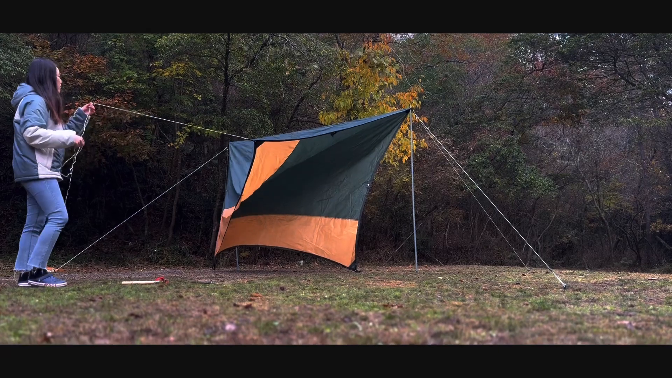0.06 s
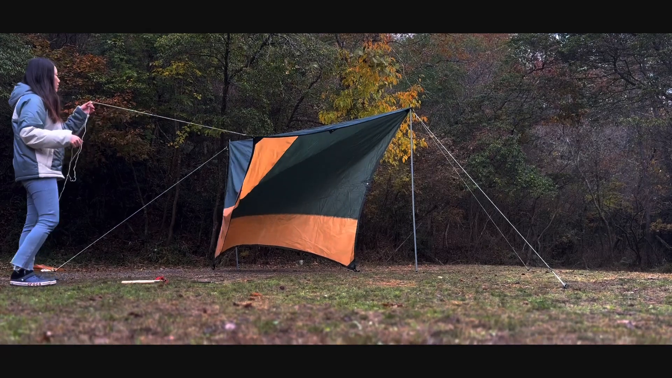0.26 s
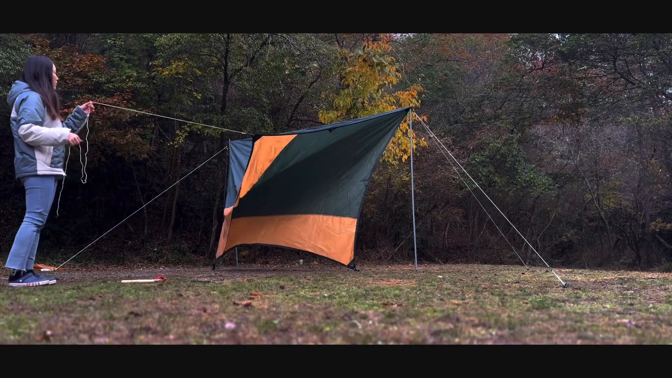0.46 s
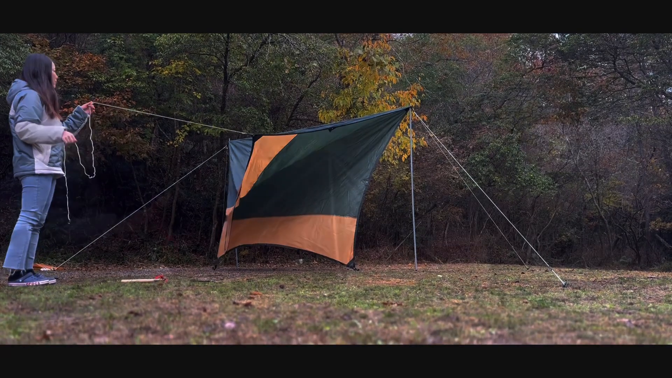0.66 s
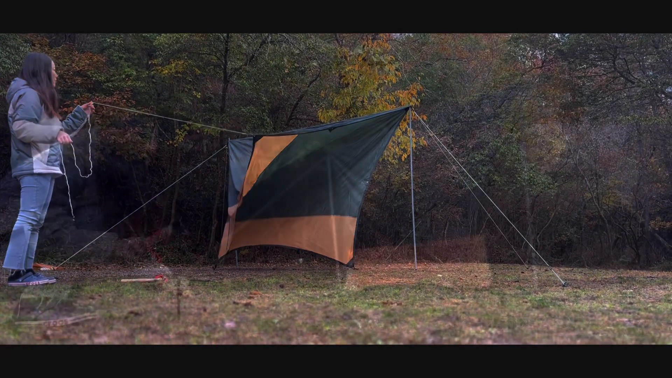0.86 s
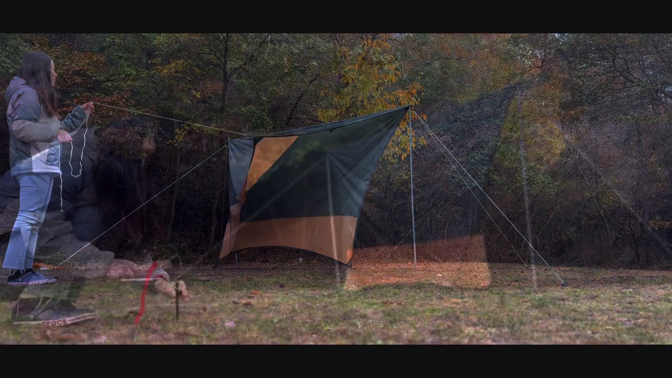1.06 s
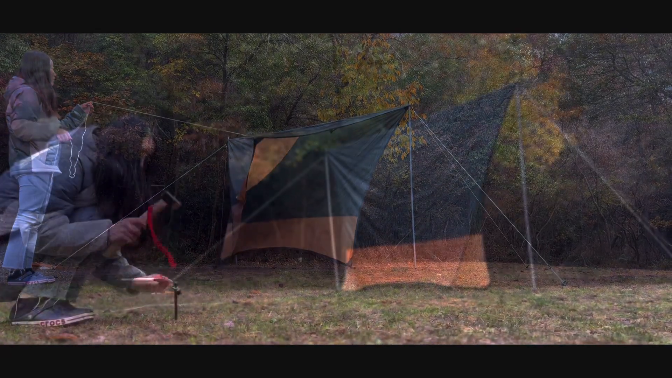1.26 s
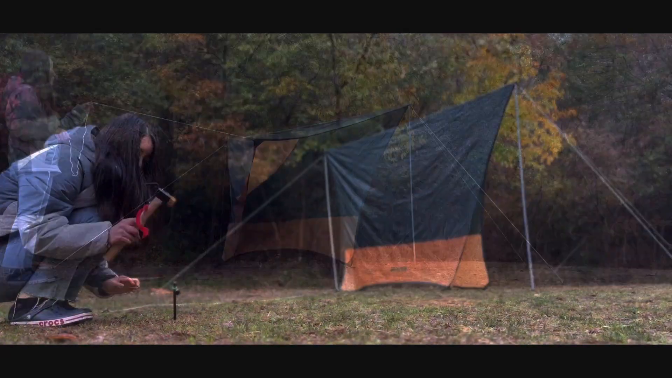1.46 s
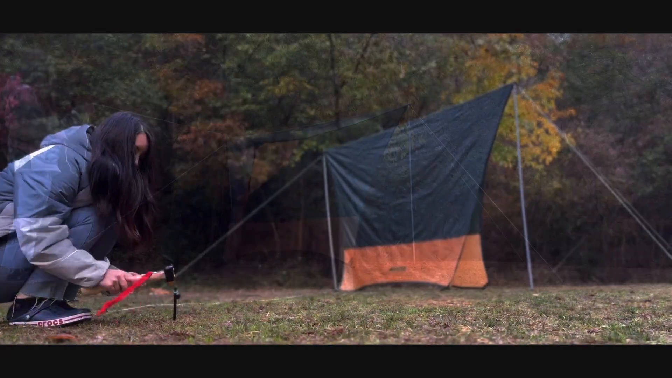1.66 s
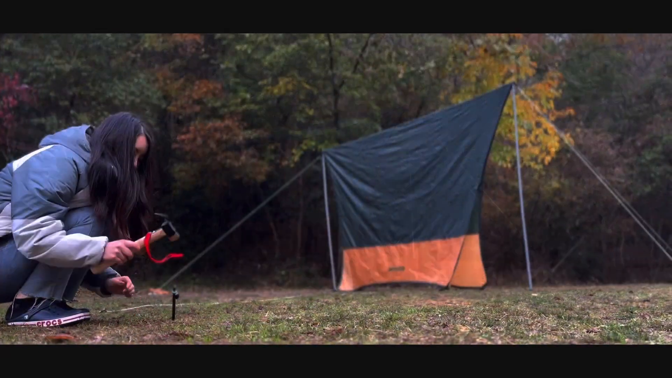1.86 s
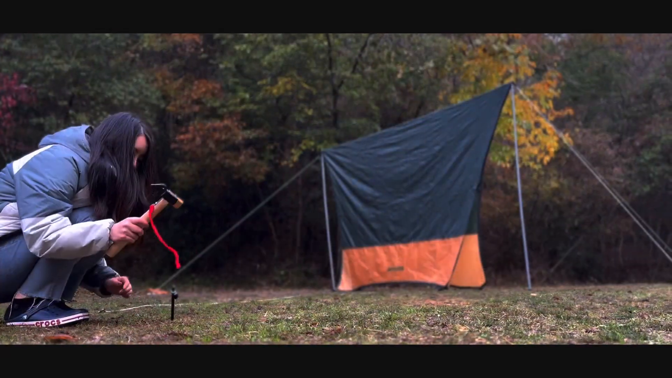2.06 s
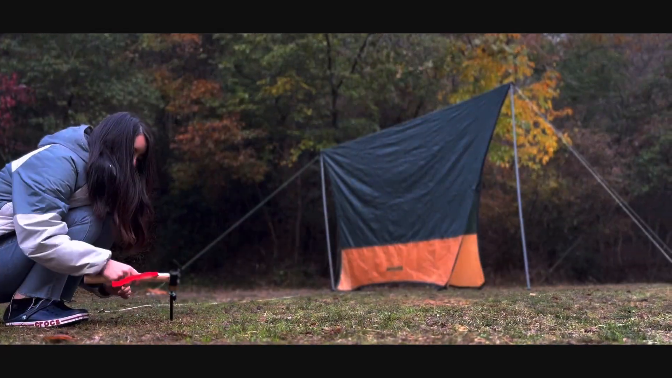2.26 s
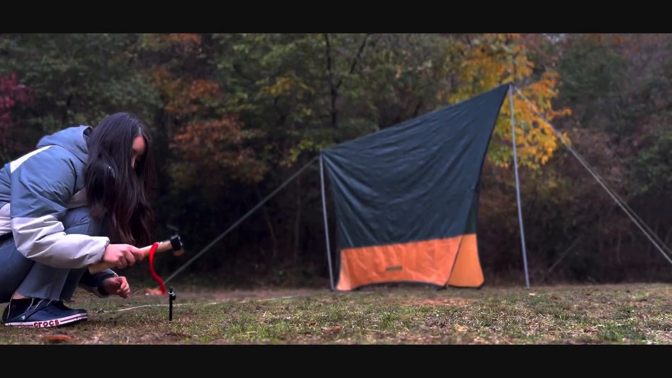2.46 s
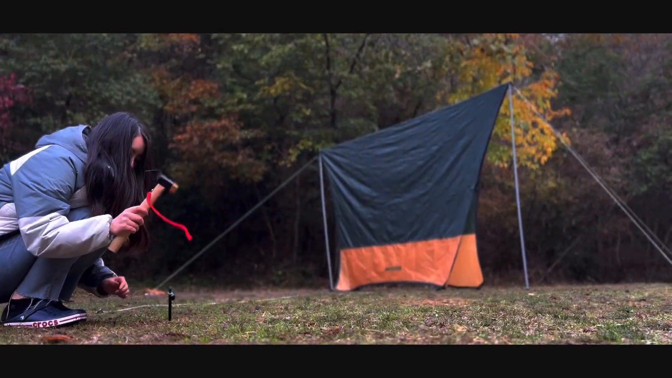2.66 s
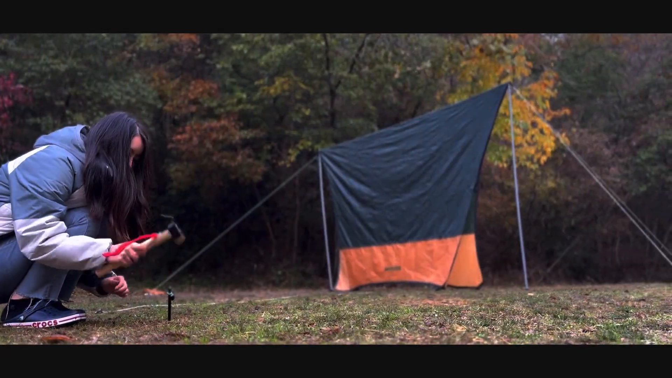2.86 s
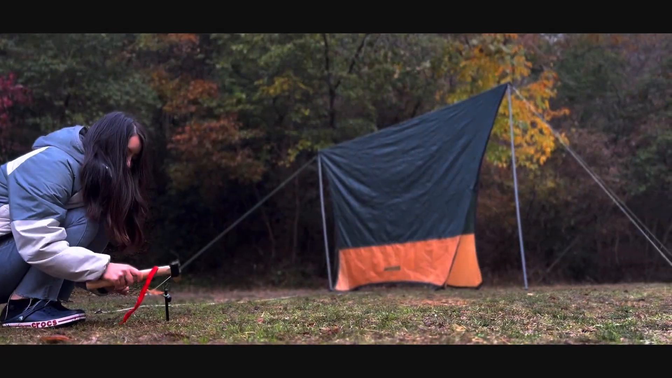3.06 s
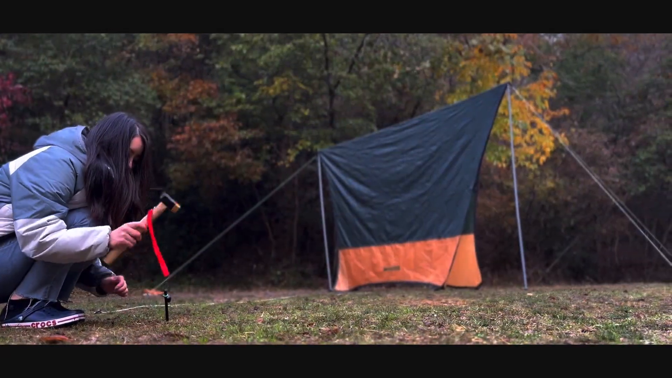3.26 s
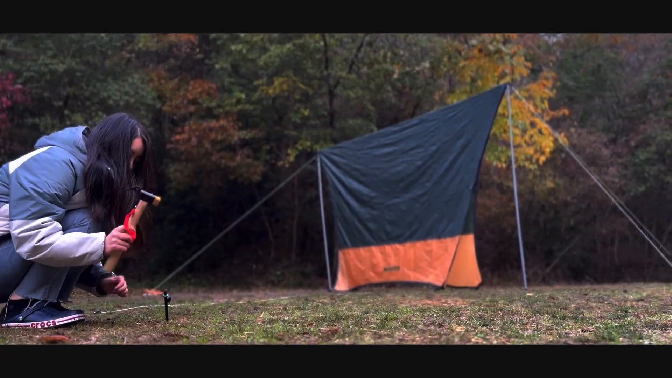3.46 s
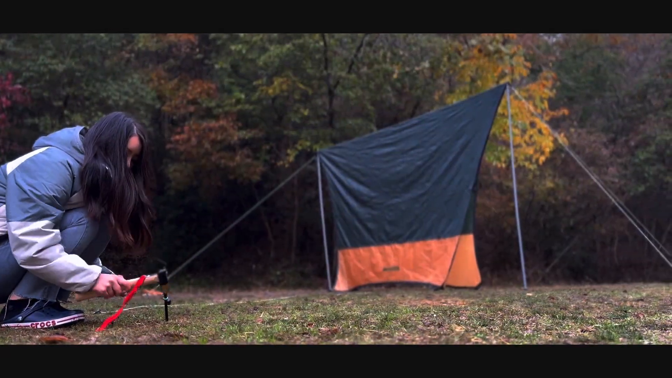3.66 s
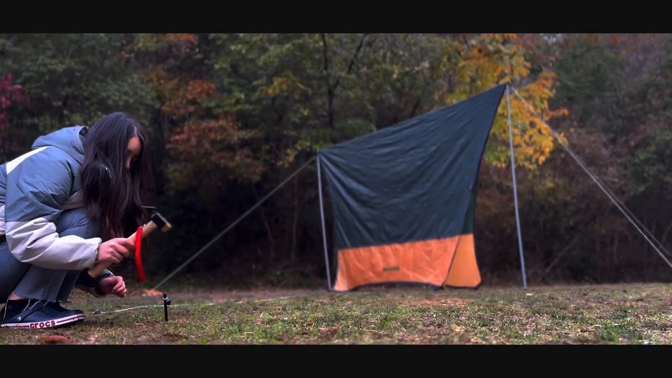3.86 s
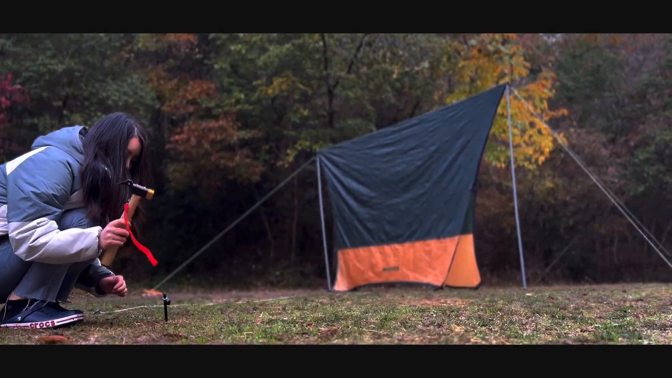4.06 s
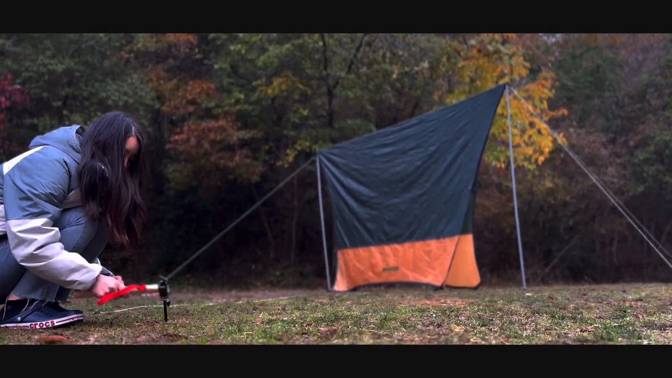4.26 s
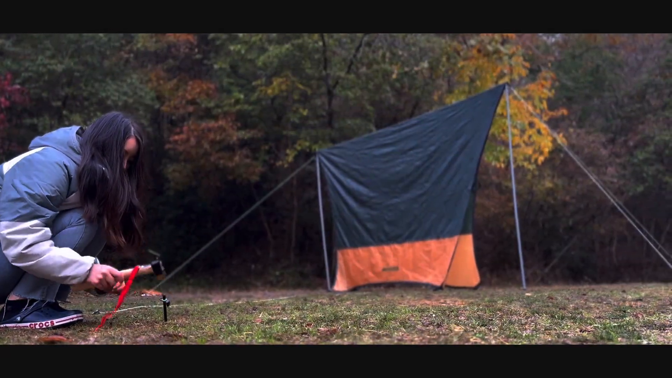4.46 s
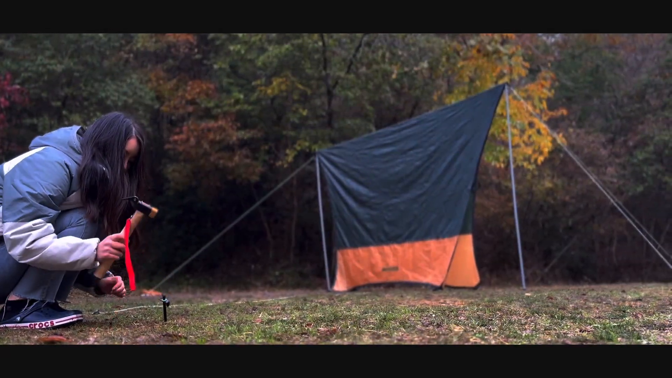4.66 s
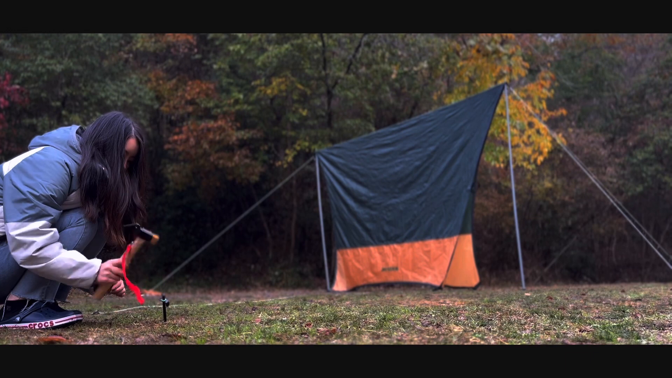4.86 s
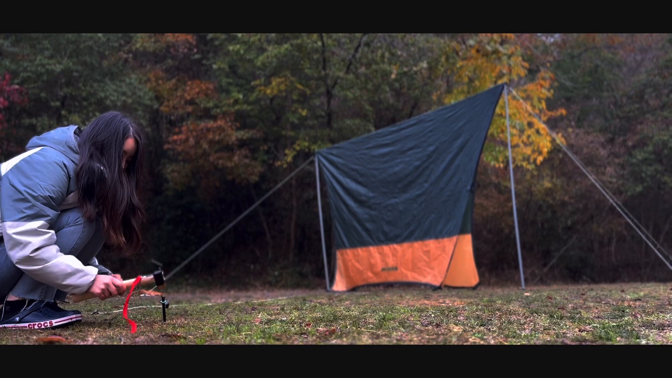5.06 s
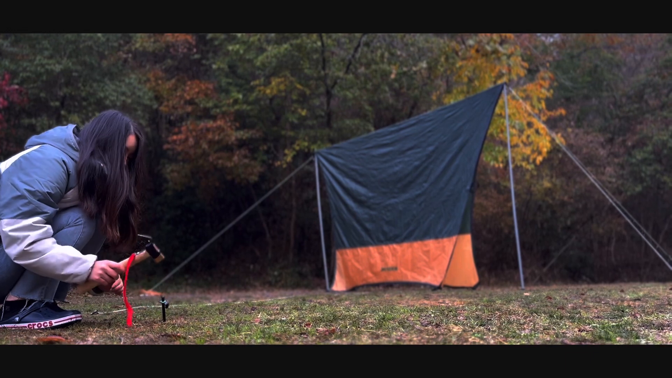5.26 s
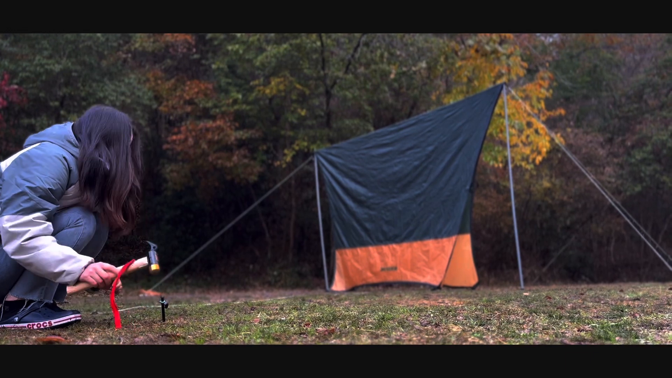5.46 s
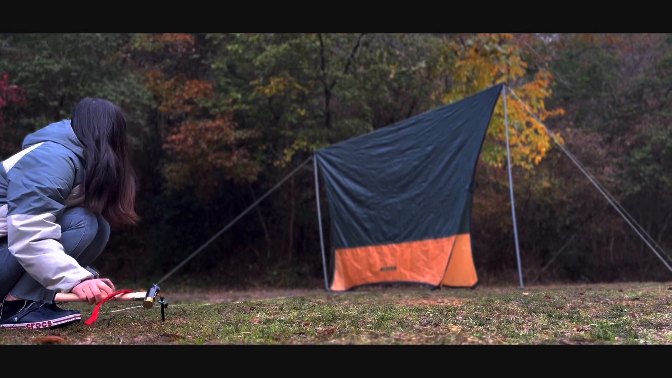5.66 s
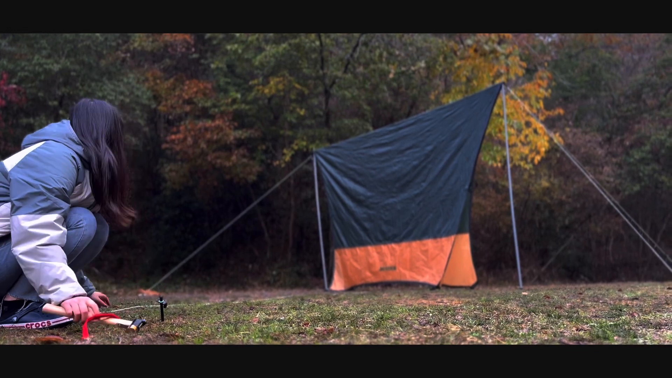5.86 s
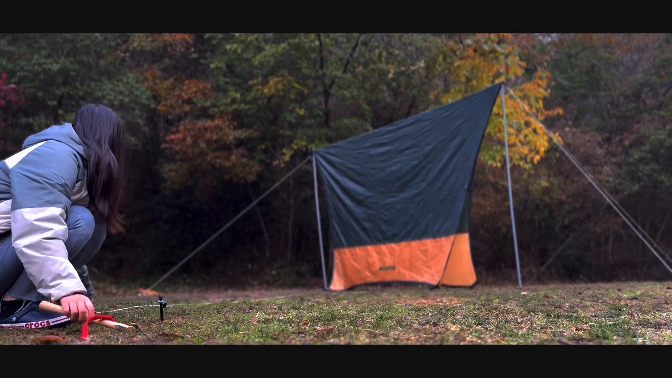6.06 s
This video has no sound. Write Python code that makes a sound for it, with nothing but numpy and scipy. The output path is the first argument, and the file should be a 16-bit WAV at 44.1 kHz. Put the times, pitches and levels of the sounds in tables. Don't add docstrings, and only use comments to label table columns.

```python
import sys
import numpy as np
from scipy import signal
from scipy.fft import irfft
from scipy.io import wavfile

SR = 44100
rng = np.random.default_rng(int(sys.argv[2]) if len(sys.argv) > 2 else 0)


def persist_wave(psi):
    counts = np.round(np.clip(psi, -1, 1) * 32767).astype(np.int16)
    wavfile.write(sys.argv[1], SR, np.atleast_2d(counts).T)


def volts(x):
    e = np.asarray(x, float) / 20
    return 10 ** e


N = 269892
CUT_S = .478

# f/Hz, level/dB, t60/s
STEEL = [(4385, -5, .06), (5000, -5, 0.045), (12970, -2.5, .025), (2400, -8, .016), (2920, -8, 0.016),
         (3626, -10, 0.014), (6000, -10, 0.014), (6750, -7, .014), (7320, -8, 0.012), (8200, -8, 0.010),
         (9300, -10, .008), (10170, -9, .008), (11320, -9, .008), (13600, -8, .012), (14300, -10, .010),
         (15400, -13, .010)]


def rms_one(x):
    return x / np.sqrt(np.mean(x ** 2) + 1e-20)


def at_hz(points, hz, column=1):
    table = np.array(points)
    table_hz = np.maximum(table[:, 0], 1)
    return np.interp(np.log(np.maximum(hz, 1)), np.log(table_hz), table[:, column])


def band(x, low_hz, high_hz):
    edges_hz = [low_hz, min(high_hz, .45 * SR)]
    return signal.sosfilt(signal.butter(2, edges_hz, "band", fs=SR, output="sos"), x)


def fall(t, t60):
    return (t >= 0) * volts(-60 * np.maximum(t, 0) / t60)


def ring(clicks, hz, t60):
    r, w = volts(-60 / (t60 * SR)), 2 * np.pi * hz / SR
    return signal.lfilter([0, np.sin(w)], [1, -2 * r * np.cos(w), r * r], clicks)


def drift(rate):
    r = np.exp(-80 * np.pi * rate / SR)
    slow = signal.lfilter([1], [1, -2 * r, r * r], rng.standard_normal(N // 40 + 2002))[2000:]
    return np.interp(np.arange(N) / 40, np.arange(len(slow)), rms_one(slow))


def banded_noise(spectrum, patchy_db, rate):
    # f/Hz, correlation
    likeness = [(60, 1), (180, 0.77), (550, 0.28), (1650, -0.54), (4970, 0.25), (15000, 0.1)]
    out, white = 0, rng.standard_normal((2, 2, N + 4000))
    edges = 20 * 2 ** np.arange(0, 9.8, 1 / 3)
    for k, (low, high) in enumerate(zip(edges, edges[1:])):
        hz = np.sqrt(low * high)
        if spectrum[0][0] <= hz <= spectrum[-1][0]:
            mid, side = band(white[k % 2], low, high)[:, 4000:]
            alike = np.clip(at_hz(likeness, hz), -1, 1)
            gain = volts(at_hz(spectrum, hz) + patchy_db * drift(rate))
            out = out + gain * (np.sqrt(1 + alike) * mid + np.sqrt(1 - alike) * side * [[1], [-1]])
    return rms_one(out)


def far_traffic(t, early):
    # f/Hz, level/dB per Hz
    rumble_spectrum = [(12, -43), (20, -12.5), (48, 0), (75, 1.5), (97, -2), (127, -7.5), (157, -13),
                       (197, -18), (312, -49), (500, -46.5), (650, -72.5), (1100, -120)]
    # t/s, level/dB, nearness as extra growl/dB
    traffic = [(0.48, -49.5, -6), (0.56, -40, -9), (0.67, -47, -2), (0.84, -45, -0.5), (1.09, -44.5, -4.1),
               (1.97, -50.5, -1), (2.27, -52.5, 6.7), (2.99, -50.5, -1.2), (3.12, -56, 6),
               (3.35, -66.5, 16.8), (3.57, -53.5, 2.6), (4.69, -51.5, 2.6), (4.91, -50, 5.2),
               (5.74, -48, -0.3), (5.88, -52.5, 1.6), (6.12, -48.5, 2.8)]
    early_db, growl_hz = -64.5, 92
    s, traffic_db, growl_db = np.transpose(traffic)
    rumble = banded_noise(rumble_spectrum, patchy_db=1.5, rate=4.1)
    deep = signal.sosfiltfilt(signal.butter(2, growl_hz, fs=SR, output="sos"), rumble)
    growl = volts(np.interp(t, s, growl_db)) * (rumble - deep)
    return volts(np.where(early, early_db, np.interp(t, s, traffic_db))) * (deep + growl)


def air_leaves_and_cloth(t, early):
    # f/Hz, level/dB per Hz
    air_spectrum = [(150, -24.5), (250, -10), (397, -29), (794, -18), (1150, -22.5), (1310, -26),
                    (2500, -35), (3250, -61), (5500, -120)]
    leaves_spectrum = [(1180, -33.5), (2000, 4.5), (2190, -4), (2980, -3), (4510, 0), (7000, -11),
                       (9100, -30), (15400, -120)]
    rustle_spectrum = [(4000, -29), (6000, -3), (7200, -2.5), (8300, 0.2), (9300, -9), (10500, -10),
                       (12200, -6), (14000, -8.5), (15800, -9.5), (16500, -30)]
    # middle t/s, half length/s, rustle level/dB, dull swish level/dB
    moves = [(0.32, 0.052, -100, -74.5), (0.553, 0.069, -86, -76.5), (.86, 0.083, -82, -85.5),
             (1.144, 0.041, -85, -73), (1.287, 0.098, -76, -72.5), (1.439, 0.16, -81.5, -81.5),
             (1.957, 0.1, -78.5, -70.5), (2.2, 0.052, -85.5, -86.5), (2.86, 0.075, -83.5, -74),
             (3.482, 0.078, -79, -76.5), (4.194, 0.064, -93, -80.5), (4.682, 0.036, -95.5, -88),
             (4.889, 0.056, -88.5, -89), (5.504, 0.12, -84, -83.5), (5.736, 0.13, -94, -89.5),
             (6.12, 0.13, -82.5, -77.5)]
    early_air_db, early_leaves_db = -81, -85.5
    air_db, leaves_db, rustle_db = -79.5, -86.5, -93
    leaves_of_rustle_db, leaves_of_swish_db = -13.5, -16
    humps = np.array([np.exp(-((t - middle) / half) ** 4) for middle, half, *_ in moves])
    cloth, swish = volts(np.transpose(moves)[2:]) @ humps
    air_level = volts(np.where(early, early_air_db, air_db)) + swish
    air = air_level * banded_noise(air_spectrum, patchy_db=3.7, rate=2.8)
    stir = volts(np.where(early, early_leaves_db, leaves_db))
    stir = stir + volts(leaves_of_rustle_db) * cloth + volts(leaves_of_swish_db) * swish
    leaves = stir * banded_noise(leaves_spectrum, patchy_db=4.04, rate=15.0)
    rustle_level = volts(rustle_db) * ~early + cloth
    rustle = rustle_level * banded_noise(rustle_spectrum, patchy_db=-1.24, rate=12.0)
    return air + leaves + rustle


def background():
    t = np.arange(N) / SR
    early = t < CUT_S
    field = far_traffic(t, early) + air_leaves_and_cloth(t, early)
    hiss = volts(-89.5) * band(rng.standard_normal((2, N)), 600, 13000)
    balance_db = 2.5
    return (field + hiss) * volts([[balance_db / 2], [-balance_db / 2]])


def ticks():
    # t/s, peak level/dB, centre f/Hz, knock level/dB
    cord_ticks = [(0.063, -60.5, 3200, -4), (.074, -72, 2200, -4), (0.112, -75, 2200, 5.5),
                  (0.299, -58.5, 6100, -2), (0.331, -55, 5400, -16), (0.347, -58, 2500, -25),
                  (0.362, -56, 5430, -19), (.376, -74, 7500, -23), (0.38, -50, 4370, -38),
                  (.411, -54.5, 5640, -40), (0.664, -55.5, 3040, -33), (1.229, -52.5, 1600, -26),
                  (4.161, -62, 5700, -19)]
    # t/s, peak level/dB, centre f/Hz, knock level/dB
    scuffs = [
        (0.279, -66, 2500, -20),
        (0.288, -53.5, 3300, -28),
        (0.308, -50, 2250, -21),
    ]
    # t/s, peak level/dB, centre f/Hz, knock level/dB, knock f/Hz
    thumps = [
        (0.312, -65.5, 1220, 9.5, 262),
        (1.345, -46, 6670, -1.5, 316),
        (1.493, -60.5, 1290, -25, 600),
        (1.786, -64, 930, 4, 500),
        (6.103, -52.5, 874, -17, 500),
    ]
    knock_of_small_hz = 1010
    tick_t60_s, scuff_t60_s, thump_t60_s = 0.0077, 0.036, 0.016
    out, t = np.zeros((2, N + 3000)), np.arange(3000) / SR
    rows = [(*row, knock_of_small_hz, tick_t60_s) for row in cord_ticks]
    rows += [(*row, knock_of_small_hz, scuff_t60_s) for row in scuffs]
    rows += [(*row, thump_t60_s) for row in thumps]
    for s, peak_db, hz, knock_db, knock_hz, t60 in rows:
        burst = rng.standard_normal((2, len(t))) * fall(t, np.clip([[t60], [.045]], .002, .06))
        snap = band(band(burst[0], hz * .5, hz * 1.4), hz * .45, hz * 1.6)
        knock = band(burst[1], knock_hz * 0.38, knock_hz * 1.2)
        tick = snap / np.abs(snap).max() + volts(knock_db + 4.5) * knock / np.abs(knock).max()
        at = round(s * SR)
        out[0, at:at + len(t)] += volts(peak_db) * tick
        out[1, at + 6:at + len(t)] += volts(peak_db - 3) * tick[:-6]
    return out[:, :N]


def chatter(t, chatter_ms):
    bounce_s, bounce_db = .0022, -5
    lasting = np.exp(-(t * 1000 / chatter_ms) ** 2)
    lasting = lasting + volts(bounce_db) * np.roll(lasting, round(bounce_s * SR))
    contacts = rng.standard_normal(len(t)) * volts(3.5 * rng.standard_normal(len(t))) * lasting
    return contacts / np.sqrt(np.sum(contacts ** 2))


def steel_modes(part_db, sunk):
    steel_part = ["shank", "hook", "head", "bend", "bend", "bend", "face", "face", "face", "face", "rim",
                  "rim", "rim", "head", "head", "tip"]
    hook_rise_per_blow = .004
    return [(hz * (1 + hook_rise_per_blow * sunk * (part == "hook")), db + part_db[part], t60)
            for (hz, db, t60), part in zip(STEEL, steel_part)]


def steel_at_microphone(t, contacts, modes):
    grip_s = .0095
    t60_share = 0.48
    steel = 0
    for hz, db, t60 in modes:
        drive = max(.4, abs(contacts @ np.exp(2j * np.pi * hz * t)))
        steel = steel + volts(db) / drive * ring(contacts, hz, t60 * t60_share)
    return np.exp(-(t / grip_s) ** 4) * steel


def steel_towards_trees(t, click, modes):
    free_ring_s = .016
    tones = sum((-1) ** k * volts(db) * ring(click, hz, t60) for k, (hz, db, t60) in enumerate(modes[:3]))
    return np.exp(-(t / free_ring_s) ** 2) * tones


def thud(t, part_db):
    # f/Hz, level/dB, t60/s
    soil = [(221, -10.5, 0.054), (281, -22.5, 0.017), (572, -19, 0.05), (700, -3.5, 0.041)]
    handle = [(913, -4, .022), (1110, -6.5, 0.046), (1436.4, -15.5, 0.041), (2075, -14, 0.02)]
    push = np.exp(-((t - .0005) / 0.000084) ** 2) / 10.9
    detune = 1 + .04 * rng.standard_normal(len(soil + handle))
    strength_db = [part_db["soil"]] * len(soil) + [part_db["handle"]] * len(handle)
    return sum(volts(db + own_db) * ring(push, hz * k, t60)
               for (hz, db, t60), k, own_db in zip(soil + handle, detune, strength_db))


def blows():
    # t/s, strength/dB, chatter/ms, squareness on the peg/dB, head ring/dB
    hammer_blows = [
        (0.9293, -15, 2.4, -13, 3.5),
        (1.583, -13, 1.4, 2.5, -6.5),
        (2.2582, -13.5, 2.5, 3, 4.5),
        (2.92, -13.5, 1.6, 1.5, -2.5),
        (3.5834, -10.5, 1.5, -8.5, -2.3),
        (4.2441, -11.5, 2.2, -7.5, 1),
        (4.9301, -12.5, 2.1, -6, -5),
    ]
    part_law = {"shank": (0.1, 1.7, .01, .01), "hook": (-3.3, -0.32, -0.27, .3),
                "bend": (2.9, 0.057, 0.77, 2.12), "face": (0.19, 0.21, 0.24, 0.067),
                "rim": (-3.5, 0.8, -0.14, 2.3), "head": (-.3, -0.1, 0.5, 0.1), "tip": (-7, -0.05, 0, 7.5),
                "soil": (-4, 0.2, -0.24, 0.47), "handle": (3, 0.48, 0.4, -0.7)}
    crack_db, crack_low_hz = 21.5, 1200
    colour = .55
    out, t = np.zeros((3, N)), np.arange(6000) / SR
    click = 1. * (t == 0)
    for sunk, (s, peak_db, chatter_ms, square_db, head_db) in enumerate(hammer_blows):
        contacts = chatter(t, chatter_ms)
        part_db = {part: np.dot(law, [1, square_db, head_db, sunk]) for part, law in part_law.items()}
        modes = steel_modes(part_db, sunk)
        steel = steel_at_microphone(t, contacts, modes)
        clean = steel_towards_trees(t, click, modes)
        heavy = thud(t, part_db)
        crack = volts(crack_db) * band(contacts, crack_low_hz, 12000)
        broad = volts(17.5) * (np.sqrt(1 - colour ** 2) * click + colour * contacts)
        at = round(s * SR) - 4
        out[:, at:at + len(t)] += volts(peak_db - 3.5) * np.array([steel + heavy + crack, clean + heavy, broad])
    return out


def rebounds():
    # t/s, level/dB
    touches = [
        (1.6118, -38),
        (2.937, -43),
    ]
    out, t = np.zeros(N), np.arange(6000) / SR
    for s, db in touches:
        touch = rng.standard_normal(len(t)) * fall(t, .007) * np.minimum(t / .0006, 1)
        at = round(s * SR)
        out[at:at + len(t)] += volts(db) * sum(volts(level) * ring(touch, hz, t60 * 0.59) for hz, level, t60 in STEEL)
    return out


def ports(x):
    # f/Hz, level/dB
    blow_balance = [(60, 2.5), (300, 1.5), (900, 5.5), (2000, 6), (4500, 5), (5800, 1.5), (8500, 4),
                    (9700, .5), (16000, 0)]
    # f/Hz, phase/rad by which left leads
    blow_phase = [(0, 0), (1000, .9), (1700, 2.4), (2300, 2.1), (3100, 3.1), (4100, 3.5), (4500, 5.5),
                  (5500, 4.6), (6300, 5.5), (7200, 8.4), (8000, 9.3), (16500, 7.2)]
    hz = np.fft.rfftfreq(512, 1 / SR)
    phase = np.interp(hz, *np.transpose(blow_phase))
    response = irfft(volts(-at_hz(blow_balance, hz)) * np.exp(-1j * phase))
    lead_in = 32
    shade = np.roll(response, lead_in)[:180] * signal.windows.tukey(180, .2)
    return np.array([x, signal.fftconvolve(x, shade)[lead_in:N + lead_in]])


def clearing(ringing, broad):
    # f/Hz, level/dB, t60/s
    trees = [(200, -45, 0.1), (500, -32, .46), (1010, -38.5, 0.7), (2050, -36, 0.52), (3200, -28.5, 0.6),
             (4750, -28, 0.57), (8700, -32, 0.4), (11340, -36.5, 0.15), (13000, -24.5, 0.34),
             (16000, -32, 0.17)]
    # level/dB, low f/Hz, high f/Hz, smear t60/s
    echoes = [
        (-33.5, 6000, 8100, .025),
        (-34, 12400, 14000, .045),
        (-32, 1500, 2600, .012),
        (-31, 1000, 2200, .020),
    ]
    echo_delays = [.0240, .0240, .019, .031]
    trees_start_s, trees_swell_s = .024, .026
    near_db, near_t60_s, near_dull_hz = -2.5, 0.25, 1800
    alike_hz = 470
    wash_db, ring_db = 9, -4.5
    t, answer = np.arange(SR) / SR, 0
    swell = 1 - np.exp(-(np.maximum(t - trees_start_s, 0) / trees_swell_s) ** 2)
    shape_white = rng.standard_normal((2, 2, SR))
    for k, low in enumerate(150 * 2 ** np.arange(0, 6.9, 1 / 3)):
        hz = low * 2 ** (1 / 6)
        alike = 1 / (1 + (hz / alike_hz) ** 2)
        common, own = shape_white[k % 2, 0], shape_white[k % 2] * [[1], [-1]]
        white = np.sqrt(alike) * common + np.sqrt(1 - alike) * own
        white = white / np.std(white, axis=1, keepdims=True)
        far = swell * fall(t - trees_start_s, at_hz(trees, hz, column=2))
        near = volts(near_db) / (1 + (hz / near_dull_hz) ** 2) * fall(t - .004, near_t60_s)
        answer = answer + volts(at_hz(trees, hz) - 22.5) * (far + near) * band(white, low, low * np.cbrt(2))
    for delay, (db, low_hz, high_hz, smear) in zip(echo_delays, echoes):
        burst = rng.standard_normal((2, SR)) * fall(t - delay, smear)
        answer = answer + volts(db - 11) * band(band(burst, low_hz, high_hz), low_hz, high_hz)
    wash = signal.oaconvolve(broad[None], answer[::-1], axes=1)[:, :N]
    rings = signal.oaconvolve(ringing[None], answer, axes=1)[:, :N]
    return volts(wash_db) * wash + volts(ring_db) * rings


def scene():
    direct, ringing, broad = blows()
    direct = direct + rebounds()
    direct = signal.lfilter(*signal.iirnotch(1714, 2.5, fs=SR), direct)
    around = clearing(ringing, broad) * volts([[.8], [-.8]]) + ticks() + background()
    top_cut = signal.cheby2(14, 50, 15780 + 250, fs=SR, output="sos")
    return ports(direct) + signal.sosfilt(top_cut, around)


def band_limit(x):
    return signal.sosfilt(signal.butter(12, 17140, fs=SR, output="sos"), x)


def record(dry):
    gain_db, ceiling = 1.5, .62
    low_cut_hz, top_hz = 36, 15850
    x = ceiling * np.tanh(volts(gain_db) * dry / ceiling)
    x = signal.sosfilt(signal.butter(3, low_cut_hz, "high", fs=SR, output="sos"), x)
    x = signal.sosfilt(signal.butter(16, top_hz, fs=SR, output="sos"), x)
    return band_limit(x)


dry = scene()
out = record(dry)
persist_wave(out)
```